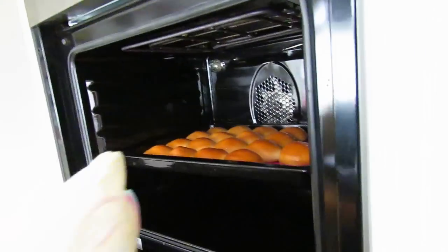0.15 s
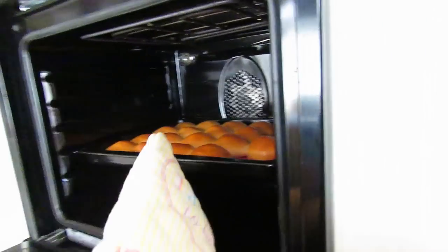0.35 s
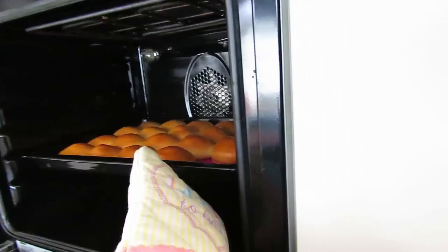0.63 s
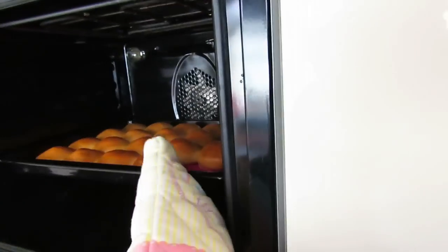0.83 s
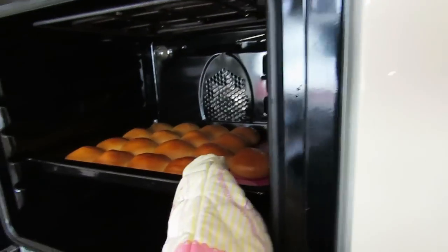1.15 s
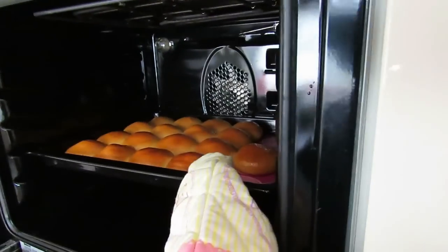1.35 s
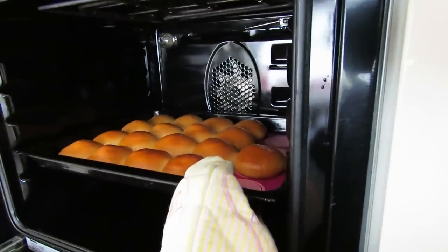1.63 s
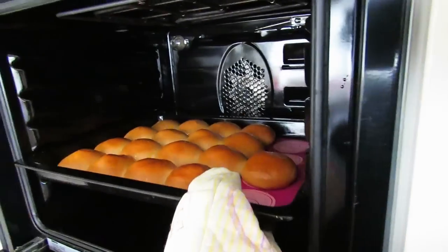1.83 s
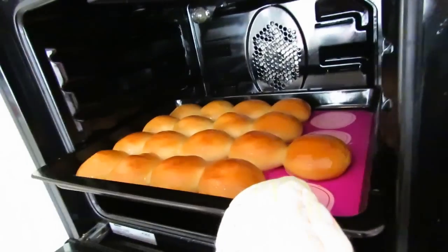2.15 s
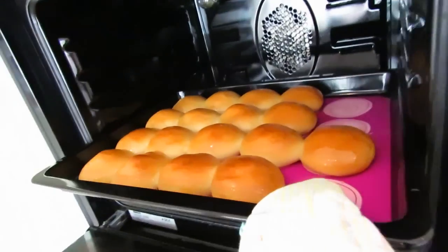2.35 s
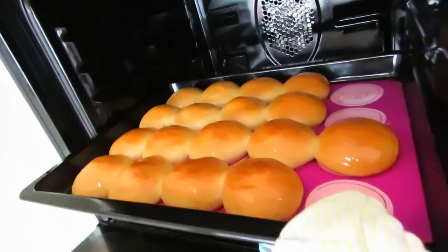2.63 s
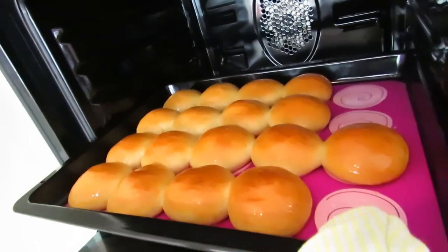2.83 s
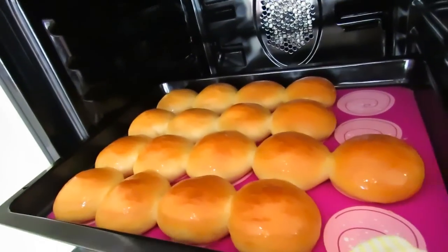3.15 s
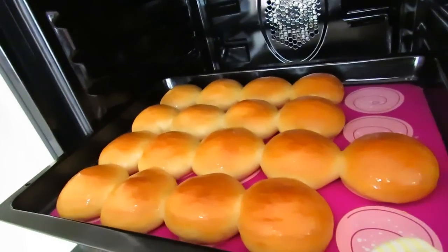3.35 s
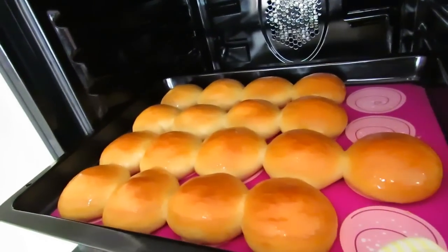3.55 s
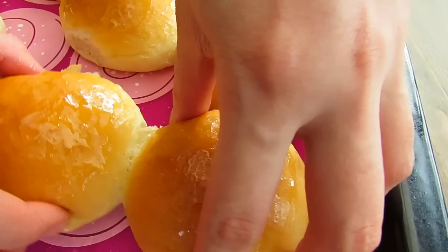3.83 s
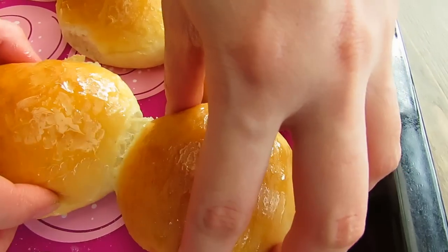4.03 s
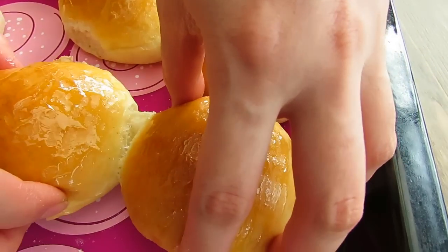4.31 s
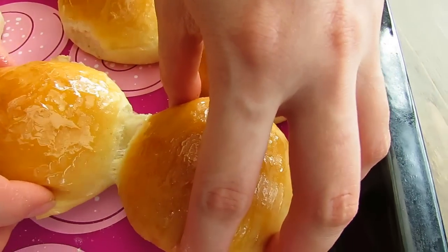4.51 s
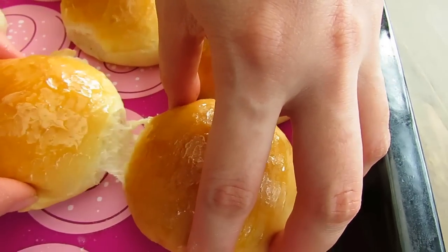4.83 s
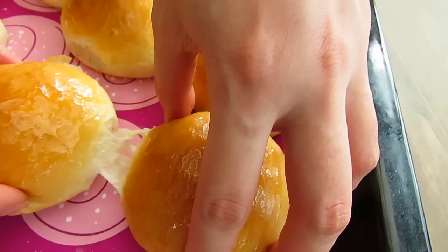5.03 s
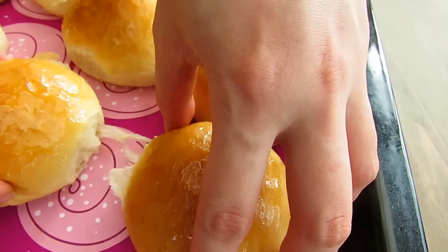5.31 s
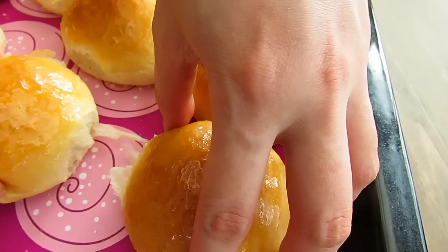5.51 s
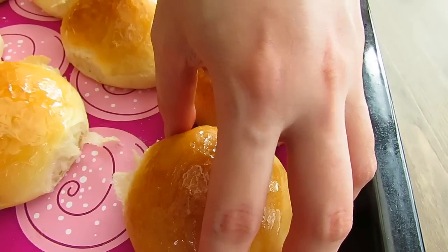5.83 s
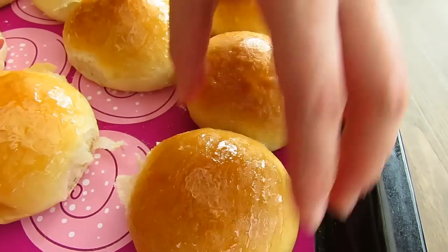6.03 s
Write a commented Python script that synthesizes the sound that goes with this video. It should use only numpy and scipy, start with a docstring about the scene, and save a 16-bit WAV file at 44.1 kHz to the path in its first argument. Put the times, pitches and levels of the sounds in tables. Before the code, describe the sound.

Close by in a kitchen, an open oven drones and rushes softly. A brief dry swish fades at the start, and small metal ticks and a few faint bird whistles dot the first second. At about 1.1 seconds a baking tray knocks loudly against the rails with a quick, ringing clatter. From 1.4 seconds it scrapes outward in two uneven pulls, catching with several rattling bumps while the hollow oven walls boom softly. At about 2.7 seconds the tray drops onto the oven door with a sharp crack, a thump and a short ring of thin metal. A few lighter ticks follow as the drone settles. At about 3.7 seconds the oven noise stops abruptly. Until the end, around 6 seconds, there is only a quiet room hush with a low rumble and very faint birds whistling and chirping outside.

```python
"""Pulling a baking tray out of the oven

Close by, an open oven drones and rushes softly. A metal tray knocks against its rails, scrapes along them
with a few bumps and drops onto the door, among small metal ticks. Each hit makes the thin metal ring.
Then the oven noise stops abruptly and the kitchen is quiet. Birds whistle and chirp faintly outside."""
import sys
import numpy as np
from scipy import signal
from scipy.fft import rfft, irfft, next_fast_len
from scipy.io import wavfile
from scipy.ndimage import uniform_filter1d, map_coordinates

SR = 44100
rng = np.random.default_rng(int(sys.argv[2]) if len(sys.argv) > 2 else 0)


def waveform_to_disk(signal):
    """Save audio, clipped to [-1, 1], as 16-bit WAV at the path in sys.argv[1]."""
    frames = np.transpose(np.atleast_2d(signal))
    scaled = np.clip(frames, -1, 1) * 32767
    samples = np.round(scaled).astype(np.int16)
    wavfile.write(sys.argv[1], SR, samples)


N = 272097
SLIDE_START_S, LANDING_S = 1.39, 2.715  # the tray starts to move; it lands on the door
OVEN_STOP_S, TOP_HZ = 3.675, 15700


def amp(db):
    """Turn decibels into a number to multiply by."""
    return 10 ** (np.asarray(db) / 20)


def unit(x):
    """Scale x to an average strength (rms) of 1."""
    return x / np.sqrt(np.mean(x ** 2) + 1e-20)


def along(points, hz):
    """Read a curve of (frequency, value) points at hz, on a scale of octaves."""
    f, v = np.transpose(points)
    return np.interp(np.log(hz + 1), np.log(f), v)


def seconds(size):
    """The time of each sample."""
    return np.arange(size) / SR


def ramp(start, length):
    """Rise from 0 to 1 over length seconds."""
    return np.clip((seconds(N) - start) / length, 0, 1)


def wobble(rate):
    """A smooth curve through rate random values a second."""
    return map_coordinates(rng.standard_normal(int(N * rate / SR) + 4), [seconds(N) * rate])


def filtered(x, response):
    """Turn each frequency of x up or down by response(hz)."""
    size = x.shape[-1]
    padded = next_fast_len(size + 8192)
    return irfft(rfft(x, padded) * response(np.fft.rfftfreq(padded, 1 / SR)), padded)[..., :size]


def dying(x, t60s):
    """Fade each frequency at its own speed; t60 is the time it takes to fall by 60 dB."""
    hz, t, bands = signal.stft(x, SR, nperseg=256)
    fade = amp(-60 * t / along(t60s, hz)[:, None])
    return signal.istft(bands * fade, SR, nperseg=256)[1][..., :x.shape[-1]]


def add(track, s, sound):
    """Mix a sound into a track at s seconds."""
    start = max(round(s * SR), 0)
    part = sound[..., :N - start]
    track[:, start:start + part.shape[-1]] += part


# How alike a close sound is in both ears: f/Hz, likeness/0-1
EAR_LIKENESS = [(150, 0.96), (500, 0.95), (1000, 1), (2000, 0.97), (4000, 0.92), (8000, 0.82), (12000, .4)]


def noise(spectrum, size=N, ripple_db=0, diffuse=0):
    """Shaped stereo noise. Ripple adds the many resonances of thin metal; diffuse makes it wider."""
    peaks = np.tanh(rng.standard_normal(SR // 120))

    def colour(hz):
        ripple = ripple_db * np.interp(hz, np.linspace(0, SR / 2, len(peaks)), peaks)
        width = np.arccos(np.clip(along(EAR_LIKENESS, hz) * (1 - diffuse), -1, .998)) / 2
        return amp(along(spectrum, hz) + ripple) * [np.cos(width), np.sin(width)]

    mid, side = filtered(rng.standard_normal((2, size)), colour)
    return unit(np.array([mid + side, mid - side]))


# The hush of the room: f/Hz, level/dB
ROOM_AIR = [(8.8, -25.5), (15, -3.5), (40, -8.5), (266, -30), (1430, -41), (2490, -38), (2790, -47.5),
            (8930, -45), (15500, -48)]


def kitchen(rumble_db, air_db):
    """A deep rumble, much the same in both ears, under faint air from all around."""
    rumble = noise([(15, 2.5), (45, -6.5), (110, -19), (250, -50), (1000, -120)], diffuse=.1)
    return amp(rumble_db) * rumble + amp(air_db) * noise(ROOM_AIR, diffuse=0.93)


def song(start, end, hz, pitch_spread, glide_spread, note_s, level_db, count):
    """One bird's loose run of notes near one pitch, as rows like WHISTLES; spreads are in octaves."""
    notes = zip(np.linspace(start, end, count), rng.standard_normal((count, 4)))
    return [(s + .025 * late, note_s, hz * 2 ** (pitch_spread * pitch), glide_spread * glide,
             level_db + 2 * loud) for s, (late, pitch, glide, loud) in notes]


# The clearest bird notes: t/s, length/s, f/Hz, glide/octaves, level/dB
WHISTLES = [(0.0, 0.21, 5390, 0.16, -61), (0.208, 0.19, 6470, 0.083, -62), (0.88, 0.23, 3634, 0.27, -57.5),
            (3.69, 0.123, 4090, -.08, -74.5), (3.922, 0.67, 477, 0.00031, -88),
            (3.994, 0.16, 2240, -.02, -77.5), (4.466, .13, 1973, 0.073, -78.5),
            (4.8, 0.362, 4020, 0, -81.5), (5.1, 0.093, 2023, 0.053, -79), (5.303, 0.13, 2630, -0.053, -78),
            (5.441, .125, 690, -0.15, -74.5)]
# Quick falling chirps: t/s, starting f/Hz, level/dB
CHIRPS = [(3.928, 4410, -72.5), (4.209, 4000, -80), (4.439, 4300, -83), (5.249, 3675, -78.5),
          (5.397, 3800, -74.5), (5.546, 3620, -77.5), (5.675, 3800, -74.5)]
# How long the garden echoes: f/Hz, t60/s
GARDEN_FADE = [(500, .6), (5000, 0.16)]


def birds(echo_db, whistle_waver, chirp_waver, flutter_db, chirp_s, chirp_octaves):
    """Gliding whistles and rough chirps arrive mostly as an echo from the garden."""
    out = np.zeros((2, N))
    drift, flutter = wobble(260), wobble(76)
    low = song(3.7, 5.9, 1950, pitch_spread=.05, glide_spread=.059, note_s=.12, level_db=-84.5, count=7)
    high = song(4.6, 5.8, 7160, pitch_spread=.1, glide_spread=.1, note_s=.07, level_db=-90, count=8)
    notes = [(*row, whistle_waver) for row in [*WHISTLES, *low, *high]]
    notes += [(s, chirp_s, hz * 2 ** (chirp_octaves / 2), chirp_octaves, db, chirp_waver)
              for s, hz, db in CHIRPS]
    for s, length, middle_hz, glide, db, waver in notes:
        progress = np.linspace(0, 1, int(length * SR))
        here = (int(s * SR) + np.arange(len(progress))) % N
        arch = (.015 + 1.4 * glide ** 2) * (2 * progress - 1) ** 2  # the pitch sags at both ends
        hz = middle_hz * 2 ** (glide * (progress - .5) - arch) * (1 + waver * drift[here])
        swell = np.abs(np.sin(np.pi * progress)) ** 0.26 * amp(flutter_db * flutter[here])
        add(out, s, amp(db - 2) * unit(swell * np.sin(2 * np.pi * np.cumsum(hz) / SR)))
    tail = dying(rng.standard_normal((2, SR)), GARDEN_FADE)
    echo = signal.fftconvolve(out, tail / np.linalg.norm(tail[0]), axes=1)[:, :N]
    return out + amp(echo_db) * echo


# The blur of distant birdsong: f/Hz, level/dB
CHORUS = [(1500, -31), (1980, 1.5), (2500, -9), (3400, -2.5), (4300, -6), (5600, -18), (7000, -14.5),
          (8500, -36.5)]


def far_birds(level_db, patchy_db):
    """Far birds blur into a chorus: noise that swells in small patches of pitch and time."""
    bands = signal.stft(noise(CHORUS, diffuse=1), nperseg=512)[2]
    calls = uniform_filter1d(rng.standard_normal(bands.shape[1:]), size=4, axis=0)
    calls = unit(uniform_filter1d(calls, size=14, axis=1))
    chorus = signal.istft(bands * amp(patchy_db * calls), nperseg=512)[1][:, :N]
    return amp(level_db) * unit(chorus)


# The low notes of the oven walls: f/Hz, width/Hz, level/dB
WALL_NOTES = [(100, 23, -1.5), (154, 35, 0.5), (194.4, 45, -0.5), (219, 26, 1.5), (288.8, 48, -5)]


def shaking_walls():
    """An uneven push makes the oven walls boom at their own notes."""
    def response(f):
        walls = sum((-1) ** k * amp(db) * 1j * f * width / (hz * hz - f * f + 1j * f * width)
                    for k, (hz, width, db) in enumerate(WALL_NOTES))
        return walls * abs(walls)

    return unit(filtered(rng.standard_normal(N), response))


# The soft rush of the oven: f/Hz, level/dB
OVEN_AIR = [(150, -20), (250, -4), (364, -6.5), (951, -10), (1040, -7.5), (1150, -14.5), (2660, -21),
            (3440, -24), (3940, -24), (11200, -36.5), (15000, -41)]


def oven(drone_db, boom_db, settle_db_per_s, air_db, still_s, still_drop_db):
    """A rush and a drone. The hollow oven booms from the first knock to the landing, then settles."""
    since_landing = np.maximum(seconds(N) - LANDING_S, 0)
    boom = ramp(RAIL_HITS[0][0], .08) * amp(boom_db - settle_db_per_s * since_landing)
    hollow = np.hypot(amp(drone_db), boom) * shaking_walls()
    sinking = amp(-still_drop_db * ramp(still_s, .12))  # quieter once the tray lies still
    return sinking * (hollow + amp(air_db) * noise(OVEN_AIR, diffuse=0.75))


def opening_swish(level_db, t60):
    """A brief dry swish that fades at the start."""
    swish = noise([(800, 4.5), (2000, -2.5), (2700, 4), (3800, 0.5), (5000, -4), (8000, -32.5)])
    return swish * amp(level_db - 60 * np.minimum(seconds(N) / t60, 2))


def faint_ticks(start, end, level_db, count):
    """Weaker taps at loose intervals, as rows like TICKS."""
    step = (end - start) / count
    return [(start + (k + place) * step, level_db + 3 * (loud - .5), 0)
            for k, (place, loud) in enumerate(rng.random((count, 2)))]


# Small metal ticks: t/s, level/dB, extra level of clank and ring/dB
TICKS = [(0.1126, -45, -1), (0.2967, -39.5, -2), (0.3928, -40.5, -0.5), (0.5065, -48, 3), (0.625, -37, -3),
         (0.7018, -33, -1.5), (0.85, -37, -5.5), (1.3129, -39.5, -5), (2.2069, -42.5, 2.5),
         (2.5712, -34.5, 2), (2.6494, -41, 4), (2.8626, -38.5, -2), (2.9203, -35, 6), (3.1935, -39, 4.5),
         (3.2897, -37, 1), (3.5181, -41.5, 1), (3.6032, -36.5, -4.5)]
# A tick's bright click: f/Hz, level/dB
CLICK = [(1500, -39.5), (2500, -17), (3900, -10.5), (6800, -6.5), (8000, -6), (11200, -4), (13400, -9.5),
         (15500, -32)]
# Its lower clank: f/Hz, level/dB
CLANK = [(250, -22), (720, 1), (1200, -10.5), (2100, -4.5), (3000, -16), (5000, -14), (8000, -43.5)]
# The notes it rings with: f/Hz, level/dB, t60/s
TICK_NOTES = [(626, -10.5, 0.64), (678, -6.5, 0.36), (1004, -10, .25), (1875, -8, 0.33), (2076, 0, 0.19),
              (2485, -12, .28), (2926, -12, 0.22), (3970, -14.5, 0.23), (5050, -26, 0.13)]


def ticks(click_db, clank_db, ring_in_db, ring_out_db, click_t60, clank_t60, rise_s, chatter_db):
    """Light taps on thin metal click and clank, and ring more once the tray is out."""
    out, t = np.zeros((2, N)), seconds(SR // 3)
    unrest = amp(chatter_db * wobble(350))
    onset = 1 - np.exp(-t / rise_s)
    for s, level_db, body_db in [*TICKS, *faint_ticks(.1, 1.1, level_db=-45.5, count=3)]:
        click = noise(CLICK, len(t), ripple_db=9.5) * amp(click_db - 60 * t / click_t60)
        clank = noise(CLANK, len(t), ripple_db=8) * amp(clank_db - 60 * t / clank_t60)
        ring = sum(amp(db + rng.normal(0, 1.5) - 60 * t / t60)
                   * np.sin(2 * np.pi * (hz * t + rng.random())) for hz, db, t60 in TICK_NOTES)
        ring *= amp(np.interp(s, [1.5, 2.5], [ring_in_db, ring_out_db]))
        chatter = unrest[int(s * SR):][:len(t)]
        tap = chatter * click + amp(body_db) * (chatter * clank + ring)
        add(out, s - .003, amp(level_db) * onset * tap)
    return out


def grating(spectrum, slips_per_s, spread_db, hiss):
    """Metal rubs on metal: tiny slips of random size each make the tray ring briefly."""
    slips = (rng.random(N) < slips_per_s / SR) * rng.standard_normal(N)
    slips *= amp(spread_db * rng.standard_normal(N))
    force = unit(slips) + hiss * rng.standard_normal(N)
    t = seconds(SR // 4)
    fade = amp(-60 * t / 0.032) + amp(-7 - 60 * t / 0.3)
    tray = noise([(100, 0.006), (15000, 0)], len(t)) * fade
    ringing = signal.fftconvolve(force[None], tray, axes=1)[:, :N]
    return unit(filtered(ringing, lambda hz: amp(along(spectrum, hz))))


# The tray catches on the rails: t/s, thud level/dB, rattle level/dB, width/s
BUMPS = [(1.557, -25, -34.5, 0.023), (1.71, -35.5, -36.5, 0.019), (1.824, -45, -28.5, 0.018),
         (1.918, -30.5, -32, 0.036), (2.45, -29, -36, 0.015)]


def bumps():
    """Each catch shakes the oven walls and rattles the rim of the tray."""
    t, out, thud = seconds(N), np.zeros((2, N)), shaking_walls()
    rim = [(250, -11), (450, 1.5), (850, 0), (1200, -4.5), (2000, -6.5), (3200, -13.5),
           (8000, -36), (15000, -35)]  # f/Hz, level/dB
    rattle = grating(rim, slips_per_s=1100, spread_db=3.5, hiss=0.21)
    for s, thud_db, rattle_db, width in BUMPS:
        swell = np.exp(-.5 * ((t - s) / width) ** 2)
        for sound, db in ((thud, thud_db), (rattle, rattle_db)):
            out += amp(db) * unit(swell * sound) * np.sqrt(np.mean(swell ** 2))
    return out


# Two overlapping pulls, each speeding up and slowing down: t/s, length/s, top speed/0-1
PULLS = [(1.419, 0.73, 0.5), (1.969, 0.76, 0.96)]
# The tray's edge rubbing on the rails: f/Hz, level/dB
SCRAPE = [(190, -34.5), (330, -4), (363, -16), (419, 2), (516, -6), (635, -1.5), (688, -4), (903, -10),
          (1320, -13.5), (1820, -13), (6130, -36), (12400, -39), (15000, -50)]


def slide(judder_db, scrape_db, grit_db, rasp_db, bright_in_db, bright_out_db, creep_speed):
    """The tray scrapes outwards with uneven grip: faster is louder, brighter and grittier."""
    moving = ramp(SLIDE_START_S, 0.037) * (1 - ramp(LANDING_S - .03, .03))
    speed = creep_speed + sum(top * np.abs(np.sin(np.pi * ramp(s, length))) for s, length, top in PULLS)
    edge = grating(SCRAPE, slips_per_s=600, spread_db=0, hiss=0.28) * amp(rasp_db * wobble(63))
    treble = filtered(edge, lambda hz: 1 - 1 / (1 + (hz / 1000) ** 4))
    off_rails = ramp(1.95 - .165 / 2, .165)  # duller as the sharp edge leaves the rails
    bright_db = bright_in_db + (bright_out_db - bright_in_db) * off_rails + 2.5 * (speed - 1)
    edge = edge - treble + treble * amp(bright_db)
    grit = grating(CLICK, slips_per_s=60, spread_db=3, hiss=0.1)
    judder = amp(judder_db) * speed ** 0.44 * shaking_walls()
    scrape = speed ** 0.81 * (amp(scrape_db) * edge + amp(grit_db) * grit)
    return moving * (judder + scrape)


# How long struck sheet metal shimmers: f/Hz, t60/s
SHIMMER_FADE = [(100, .5), (500, 0.31), (1500, 0.4), (4000, 0.32), (12000, 0.29)]


def knock(hits, notes, shimmer, ring_db, shimmer_db, crack_db, crack_t60):
    """Quick hits make metal crack, shimmer and ring; a longer contact gives a duller ring."""
    out, t = np.zeros((2, N)), seconds(SR // 2)
    ring = sum(amp(db - 60 * t / t60) * np.sin(2 * np.pi * hz * t) for hz, db, t60 in notes)
    for s, db, contact_s in hits:
        sheet = dying(noise(shimmer, len(t), ripple_db=7), SHIMMER_FADE) * amp(shimmer_db)
        crack = noise([(200, -21), (600, -2), (2500, -1.5), (5500, -28.5), (14000, -27.5)], len(t))
        crack *= amp(crack_db - 60 * t / crack_t60)
        force = np.exp(-t[:256] / (contact_s / np.pi))
        struck = signal.fftconvolve(ring, force / force.sum())[:len(t)]
        add(out, s, amp(db) * (sheet + crack - amp(ring_db) * struck))
    return out


# The tray hits the rails: t/s, level/dB, contact time/s
RAIL_HITS = [(1.0912, -28, .0005), (1.0938, -9.5, 0.00041), (1.0992, -21, 0.00027), (1.1065, -32.5, .0003),
             (1.1155, -23.5, 0.00036)]
# The notes each hit rings with: f/Hz, level/dB, t60/s
RAIL_NOTES = [(218, 0.5, 0.21), (320.5, -20, 0.62), (369, -19.5, 0.41), (485, -19, 0.58),
              (876.6, -13, 0.33), (1210, -19.5, 0.38), (1470, -33.5, 0.52), (1627, -30, 0.43),
              (1878, -22.5, 0.36), (2396, -34.5, 0.45), (2920, -33, 0.19), (3273, -37, 0.32),
              (3718, -32.5, 0.37), (4514, -43, 0.2)]
# The shimmer of notes too crowded to tell apart: f/Hz, level/dB
RAIL_SHIMMER = [(60, -41), (115, -18), (225, -9), (280, -9.5), (850, -18.5), (1020, -29.5), (2320, -34.5),
                (4500, -41), (15000, -63)]


def rail_knock():
    """The tray clatters against its rails and rings over a short, low thump."""
    thump = (180.6, -2.5, 0.11)  # one more note
    return knock(RAIL_HITS, [*RAIL_NOTES, thump], RAIL_SHIMMER,
                 ring_db=-0.5, shimmer_db=-6.5, crack_db=-14, crack_t60=0.043)


# The tray hits the door: t/s, level/dB, contact time/s
DOOR_HITS = [(2.7171, -15, 0.00012), (2.7195, -10.5, 0.00045)]
# The notes each hit rings with: f/Hz, level/dB, t60/s
DOOR_NOTES = [(187, -0.5, 0.25), (423, -12, 0.14), (725.5, -23, 0.51), (1160, -34.5, 0.21),
              (1600, -15, 0.091), (1720, -26, .26), (2064, -11, 0.059), (2507, -29.5, .29),
              (2980, -30, 0.17), (3060, -33, 0.09), (4170, -28.5, 0.035)]
# The shimmer of the landing: f/Hz, level/dB
DOOR_SHIMMER = [(60, -28), (110, -15), (184, -5), (320, -14), (748, -13.5), (1290, -36.5), (1800, -27.5),
                (4200, -35.5), (5800, -47), (12400, -44.5), (15000, -60.5)]


def door_landing():
    """The tray drops onto the open door with a sharp crack and a thump."""
    thump = (190, 3, 0.09)  # one more note
    return knock(DOOR_HITS, [*DOOR_NOTES, thump], DOOR_SHIMMER,
                 ring_db=-5, shimmer_db=-12.5, crack_db=-6.5, crack_t60=0.025)


def scene():
    """The tray and the oven sound until they stop abruptly, over the kitchen and the birds."""
    near = rail_knock() + door_landing()
    near += slide(judder_db=-40, scrape_db=-35, grit_db=-66, rasp_db=0.5,
                  bright_in_db=9, bright_out_db=2, creep_speed=0.12)
    near += bumps() + opening_swish(level_db=-35.5, t60=0.43)
    near += ticks(click_db=-7, clank_db=-3, ring_in_db=-10.5, ring_out_db=-5.5,
                  click_t60=0.17, clank_t60=0.23, rise_s=0.0028, chatter_db=-0.2)
    near += oven(drone_db=-57.5, boom_db=-44.5, settle_db_per_s=15.5, air_db=-50.5,
                 still_s=3.3, still_drop_db=6)
    # cut the deepest bass from the close sounds
    near = signal.sosfilt(signal.butter(4, 72, "high", fs=SR, output="sos"), near)
    until_stop = np.clip((OVEN_STOP_S - seconds(N)) / 0.0018, 0, 1)
    outside = birds(echo_db=1.5, whistle_waver=0.0088, chirp_waver=0.033, flutter_db=2.5,
                    chirp_s=.06, chirp_octaves=-0.35)
    outside += far_birds(level_db=-79, patchy_db=7)
    return until_stop * near + kitchen(rumble_db=-61, air_db=-64.5) + outside


def record(dry):
    """Remove the very highest treble."""
    return filtered(dry, lambda hz: hz < TOP_HZ)


dry = scene()
out = record(dry)
waveform_to_disk(out)
```